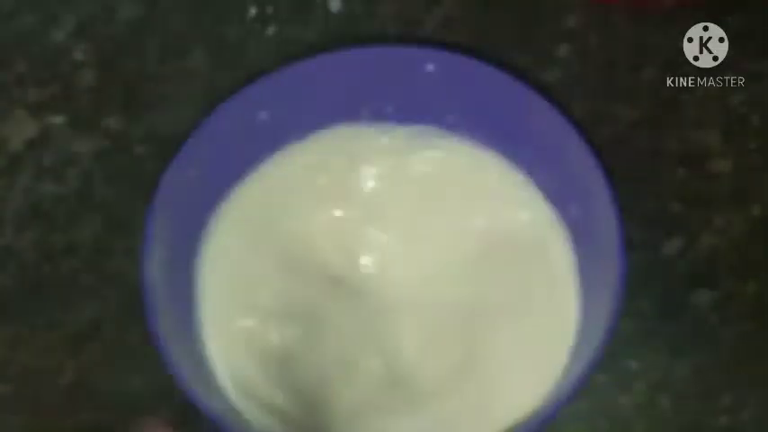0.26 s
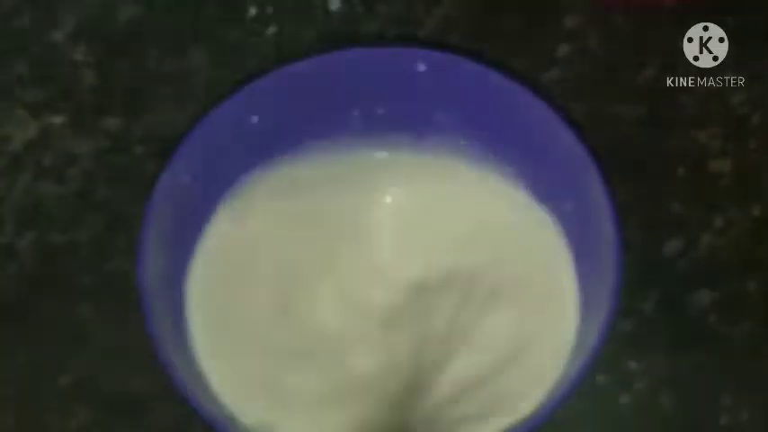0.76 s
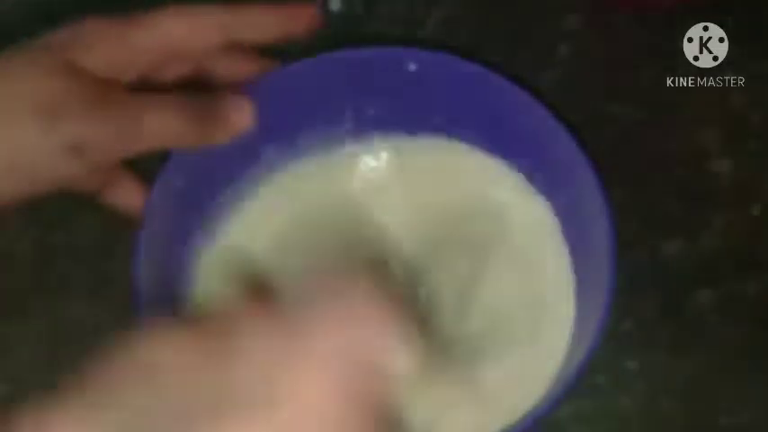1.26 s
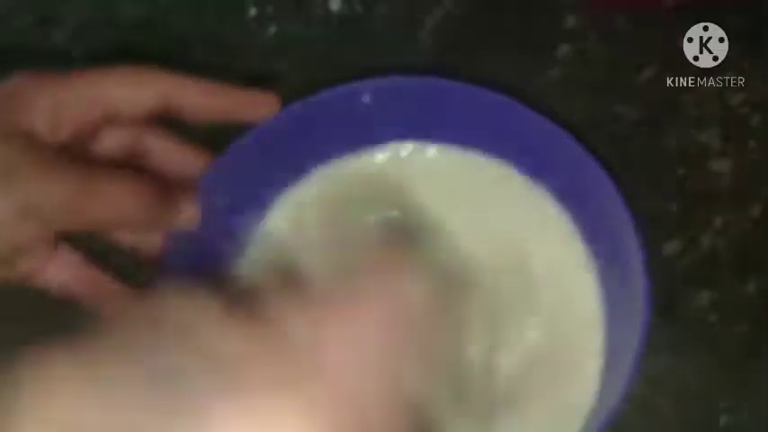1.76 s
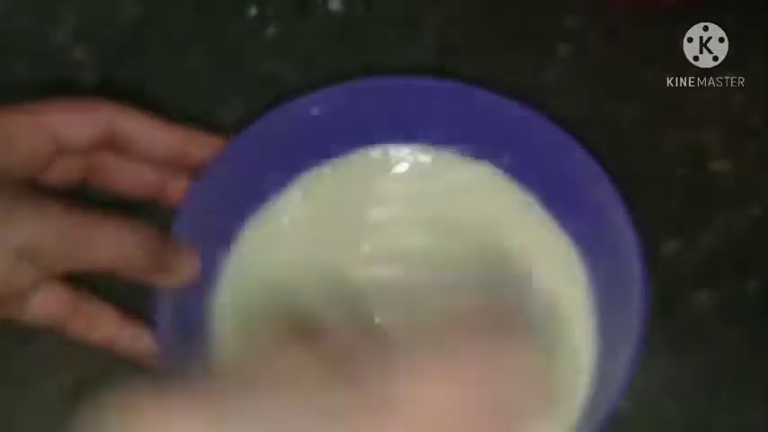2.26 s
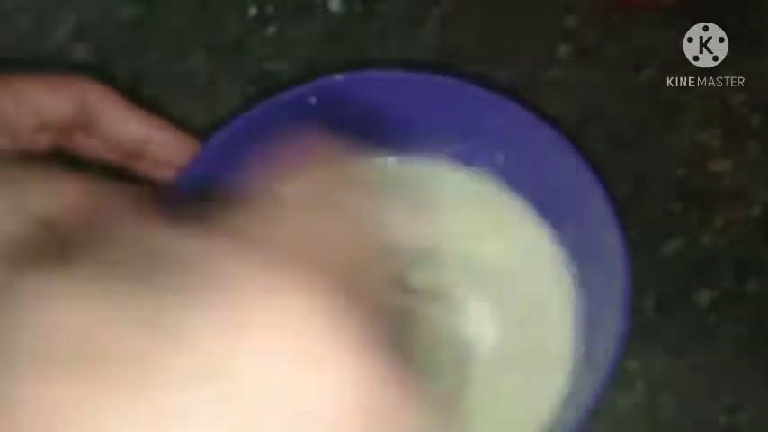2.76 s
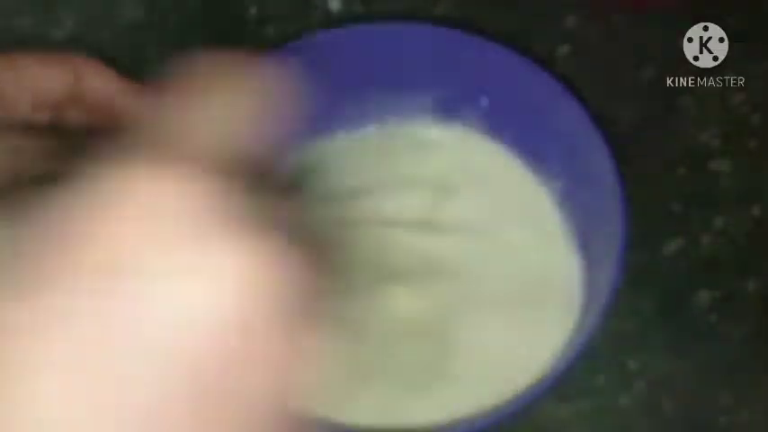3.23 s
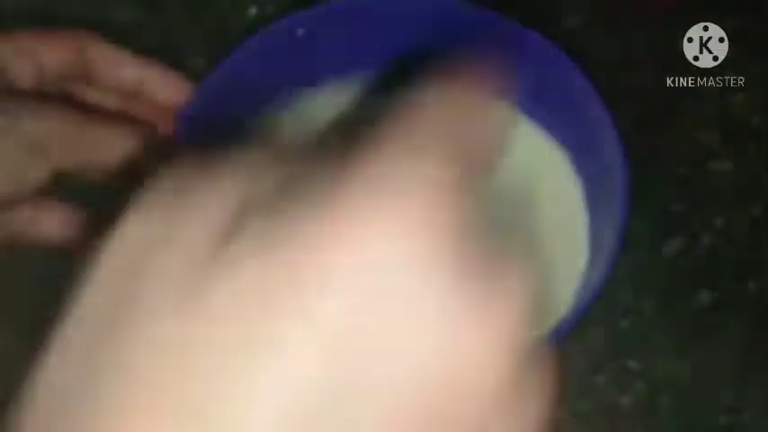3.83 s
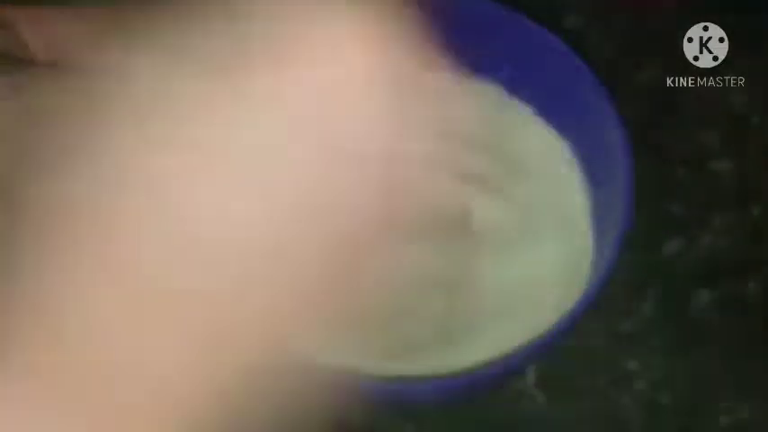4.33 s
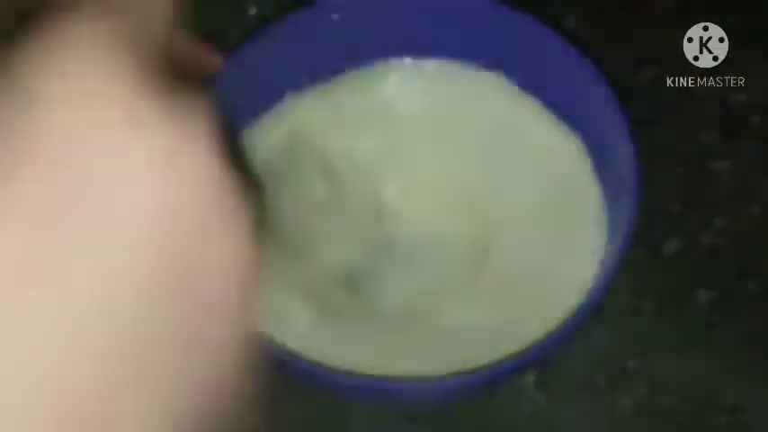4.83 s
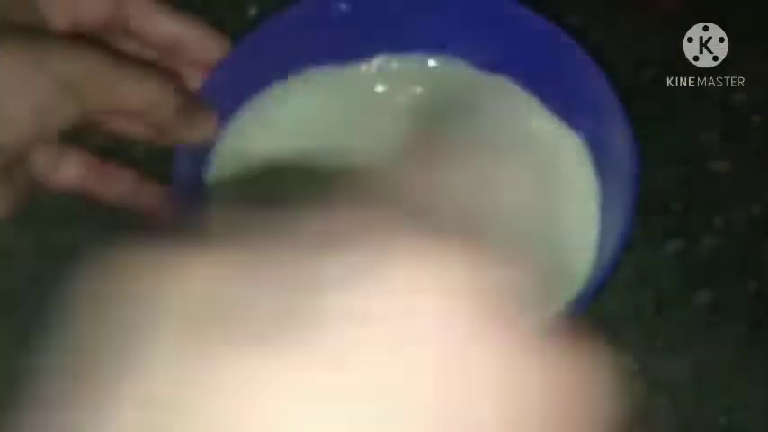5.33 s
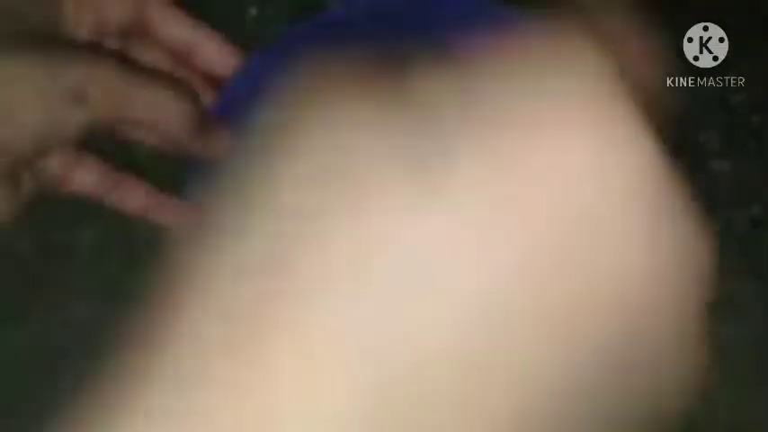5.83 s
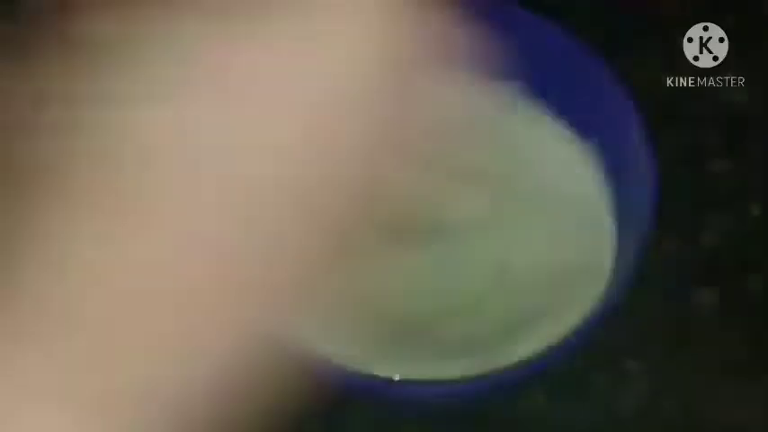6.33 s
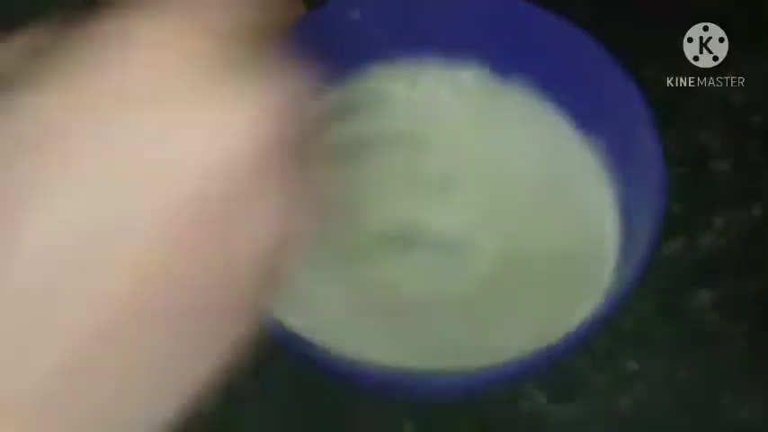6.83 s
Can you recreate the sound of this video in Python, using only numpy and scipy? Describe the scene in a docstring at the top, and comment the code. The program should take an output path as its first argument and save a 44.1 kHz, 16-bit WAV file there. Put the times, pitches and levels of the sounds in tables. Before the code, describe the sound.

A wire whisk beats thin batter in a plastic bowl at about four or five sweeps a second. Bright clacks on the wall alternate with duller wet sloshes, skittering wire clicks and bubbly swishes. After about four seconds the strokes get stronger and the bowl rings more hollowly, with soft bumps on the counter. Close microphone in a small, lightly reverberant kitchen, over faint hum and hiss.

```python
"""A wire whisk beats thin batter in a plastic bowl, about four and a half sweeps a second, in a small kitchen.
From the start bright touches clack on the wall, dull ones slosh softly, and clicks skitter after both; between
them the wires tear a swish from the batter and leave ringing bubbles. Hollow bowl notes bend, soft bumps fall.
After about four seconds the strokes swell, and from 4.8 s the hand bears down and the bowl rings more.
Mains hum, made of sines, and a rumble with hiss, made of coloured noise, lie underneath to the end."""
import sys
import numpy as np
from scipy import signal
from scipy.fft import rfft, irfft
from scipy.io import wavfile

SR = 44100
rng = np.random.default_rng(int(sys.argv[2]) if len(sys.argv) > 2 else 0)


def materialize(psi):
    """Save the field psi as 16-bit PCM at rate SR to the path in sys.argv[1].

    A 1-D psi becomes a single channel; in a 2-D psi each row is a channel.
    """
    bounded = np.clip(np.atleast_2d(psi).T, -1, 1)
    quanta = np.round(bounded * 32767).astype(np.int16)
    wavfile.write(sys.argv[1], SR, quanta)


N = 312649
T = np.arange(N) / SR

# mains lines: (frequency [Hz], rms level [dB])
HUM = [(49.7, -60), (99.2, -68), (149, -69)]
# colour of the still room: (frequency [Hz], relative density [dB per Hz])
ROOM_COLOUR = [(20, 0.5), (45, -10), (80, 5), (115, 0), (180, -11.5), (400, -8), (1500, -32), (6000, -16.5),
               (15000, -28)]
ROOM_RMS_DB = -61
# bumps of the bowl rocking on the counter: (time [s], relative level [dB])
THUMPS = [(1.37, -42), (2.118, -46), (2.298, -46), (3.291, -45), (4.843, -48), (5.448, -42), (5.887, -41),
          (6.099, -37.5), (6.338, -42), (6.952, -41.5)]
# sweeps of the whisk through the batter, about one a turn: (time [s], stroke level [dB], hold [s])
SWEEPS = [(-0.02, -46, 0.026), (0.222, -47.5, 0.026), (0.482, -45, 0.058), (0.67, -44.5, 0.13),
          (0.908, -49.5, 0.046), (1.24, -59, 0.19), (1.43, -50, 0.13), (1.775, -46, 0.055),
          (1.955, -52, 0.14), (2.206, -54.5, 0.15), (2.48, -47, 0.1), (2.57, -48.5, 0.014),
          (2.786, -54, 0.0081), (2.96, -48, 0.014), (3.04, -45, 0.046), (3.346, -47.5, .1),
          (3.61, -46, 0.11), (3.834, -43, 0.084), (4.028, -47.5, 0.13), (4.284, -37.5, 0.017),
          (4.495, -38, 0.037), (4.714, -37, 0.013), (4.941, -37, 0.016), (5.15, -36.5, 0.027),
          (5.322, -42, 0.12), (5.609, -39, 0.022), (5.798, -42.5, 0.1), (6.013, -39.5, .08),
          (6.241, -41, 0.098), (6.496, -38.5, 0.044), (6.711, -42, 0.091), (6.959, -40, 0.082)]
SWEEP_ATTACK_S, SWEEP_RELEASE_DB_PER_S = 0.036, 117
STIR_DB = -50.5  # the batter keeps swirling between sweeps
# the hand bears down from this time on, and the bowl rings more
FIRM_FROM_S, FIRM_RISE_S, LIGHT_HAND_DB = 4.8, 0.77, -9
# hollow notes of the bowl as the wires knock or press on it, each bending a little:
# (time [s], pitch [Hz], relative level [dB])
HOLLOW_NOTES = [(0.257, 878, -34.5), (1.163, 1894, -41.5), (1.288, 1670, -39), (1.382, 897, -39),
                (1.475, 880, -35), (2.641, 857, -34), (3.945, 920, -40), (4.273, 887, -38.5),
                (4.553, 1717, -27.5), (4.794, 886, -28), (4.993, 865, -28), (5.197, 1723, -30),
                (5.453, 892, -28.5), (5.899, 897, -28.5), (6.106, 899, -34), (6.17, 893, -34.5),
                (6.54, 1717, -30), (6.58, 917, -33.5), (6.615, 892, -32.5)]
# fainter notes that every touch wakes: (pitch [Hz], level relative to the touch [dB])
FAINT_NOTES = [(1760, -24.5), (2300, -28.5), (3250, -25.5)]
# colour of the torn batter: (frequency [Hz], relative density [dB per Hz])
SWISH_COLOUR = [(120, -62), (200, -24), (407, -15.5), (506, -21), (575, -9.5), (812, -11), (890, 6),
                (1050, -20), (1510, -7.5), (1740, -3.5), (1980, -6.5), (6240, -13.5), (9660, -23.5),
                (15500, -19)]
# colour of wire on plastic: (frequency [Hz], relative density [dB per Hz])
TOUCH_COLOUR = [(120, -56), (200, -31), (462, -33.5), (575, -5), (677, -2.5), (890, -4), (1030, -0.5),
                (1450, -12), (1740, 5.5), (1980, -5.5), (2960, -3.5), (4030, -6.5), (6130, -7),
                (10000, -16), (15500, -3)]
# clear touches of the whisk: bright rows are clacks on the wall, dull ones soft sloshes of batter:
# (time [s], relative level [dB], hollowness [dB], brightness [dB], t60 of the skitter [s])
CONTACTS = [(0.026, -18.5, -26, -18, 0.08), (0.131, -28, -9.5, -24, 0.16), (0.171, -19, -15, -12, 0.061),
            (0.249, -16.5, -17.5, -18.5, 0.082), (0.354, -21, -9.5, -18, 0.083),
            (0.366, -21.5, -12.5, -10, 0.064), (0.486, -10, -18.5, -13.5, 0.038),
            (0.567, -26, -9, -25, 0.052), (0.583, -19.5, -12, -12, 0.14), (0.711, -13, -18, -15, 0.049),
            (0.821, -17, -18, -12, 0.07), (0.932, -14, -17.5, -12, 0.047), (0.974, -27, -8, -15, 0.13),
            (1.05, -28, -11.5, -17, 0.087), (1.162, -30, -19, -16, 0.051), (1.257, -27, -6.5, -13, 0.086),
            (1.264, -20.5, -16, -21, 0.052), (1.286, -30, -22, -10, 0.07),
            (1.353, -27.5, -11.5, -13.5, 0.18), (1.46, -20.5, -8.5, -15, 0.051),
            (1.474, -20, -12, -13.5, 0.055), (1.59, -29.5, -12, -15.5, 0.21),
            (1.723, -23.5, -9.5, -11.5, 0.028), (1.737, -22, -15, -15, 0.044),
            (1.792, -25.5, -23, -16, 0.098), (1.814, -26, -26, -16, 0.086),
            (1.961, -25.5, -11.5, -15, 0.098), (1.976, -19, -18.5, -19.5, 0.038),
            (2.032, -25.5, -11, -20, 0.098), (2.066, -26.5, -14, -19, 0.21), (2.204, -24, -12, -18, 0.049),
            (2.224, -20, -32, -12.5, 0.1), (2.296, -19.5, -11, -17, 0.11), (2.333, -23, -23, -22, 0.2),
            (2.364, -22.5, -11, -20, 0.12), (2.45, -25.5, -33, -17, 0.047), (2.479, -22, -26, -16, 0.035),
            (2.528, -29.5, -8, -26, 0.21), (2.629, -13.5, -16, -17, 0.097), (2.778, -25.5, -24, -23, 0.11),
            (2.824, -19, -24, -19, 0.086), (2.913, -33.5, -7, -18, 0.053), (2.975, -24, -15, -24, 0.18),
            (3.077, -9.5, -13, -12.5, 0.059), (3.205, -23, -10, -29, 0.064),
            (3.288, -22, -14, -15.5, 0.087), (3.398, -23, -22, -16, 0.047), (3.411, -26, -13, -17, 0.095),
            (3.47, -25, -36, -16, 0.21), (3.603, -20.5, -14.5, -19, 0.027), (3.628, -19, -20, -15, 0.046),
            (3.671, -20.5, -20, -23, 0.07), (3.701, -20.5, -31, -18, 0.07), (3.865, -24.5, -14, -22, 0.048),
            (3.887, -16, -22, -15, 0.058), (3.927, -23.5, -22, -15, 0.11), (4.069, -20.5, -19, -16, 0.051),
            (4.112, -20, -40, -18, 0.097), (4.149, -22.5, -32, -20, 0.19), (4.26, -23.5, -14, -23, 0.11),
            (4.3, -22.5, -13, -18, 0.1), (4.328, -11, -18, -18, 0.032), (4.358, -20.5, -17, -18, 0.07),
            (4.487, -29.5, -8.5, -19, 0.07), (4.516, -22.5, -15, -21, 0.084),
            (4.549, -15.5, -13.5, -22, 0.046), (4.618, -21.5, -6, -13.5, 0.088),
            (4.748, -18.5, -6, -13, 0.056), (4.755, -9, -12, -14.5, 0.033), (4.788, -25, -4, -25, 0.043),
            (4.845, -11.5, -10.5, -15.5, 0.066), (4.977, -10.5, -14.5, -15.5, 0.08),
            (5.18, -14.5, -12.5, -18, 0.047), (5.268, -18.5, -14, -18, 0.058),
            (5.371, -16.5, -10.5, -15, 0.079), (5.446, -18.5, -4.5, -15, 0.036),
            (5.492, -22, -8, -14, 0.055), (5.603, -21.5, -11, -15.5, 0.2), (5.635, -19, -13, -20, 0.078),
            (5.709, -20.5, -24, -19, 0.07), (5.796, -28, -5, -12, 0.04), (5.817, -17, -17, -14, 0.045),
            (5.841, -18, -13, -12, 0.049), (5.89, -16, -11, -16.5, 0.053), (5.934, -18.5, -15, -23, 0.032),
            (6.044, -14, -19, -16, 0.023), (6.072, -18, -12, -14, 0.041), (6.099, -25, -6, -14, 0.081),
            (6.154, -17, -17, -21, 0.041), (6.274, -18, -14.5, -18, 0.075), (6.3, -19.5, -6.5, -8, 0.027),
            (6.34, -20, -9, -12, 0.045), (6.373, -29, -22, -20, 0.07), (6.506, -17.5, -17, -20.5, 0.055),
            (6.537, -20, -12.5, -15, 0.039), (6.606, -21.5, -9, -15, 0.054), (6.712, -25.5, -7, -12, 0.033),
            (6.737, -19, -10.5, -13.5, 0.13), (6.792, -23, -12, -32, 0.12), (6.847, -18, -6.5, -18, 0.044),
            (6.943, -28, -9, -13, 0.046), (6.97, -18.5, -11, -13.5, 0.066), (7.006, -25.5, -4.5, -18, 0.11),
            (7.08, -22, -9, -21, 0.062)]
# light grazes besides the clear touches; their level is counted from the stroke level
GRAZES_PER_S = 6
GRAZE_DB, GRAZE_HOLLOW_DB, GRAZE_BRIGHT_DB, GRAZE_T60_S = 17.5, -18.5, -18.5, 0.042
# resonances of the bowl and the wires: (frequency [Hz], width [Hz], lift, or dip if negative [dB])
BOWL_RESONANCES = [(409.3, 31, 9.5), (578, 13, 8.5), (660, 7.3, 5.5), (768, 17.5, 8), (880, 36, 2),
                   (1300, 140, 3), (1886, 26, 2.5), (2280, 110, 1.5), (2950, 420, 3.5), (3470, 120, 2),
                   (3750, 45, 6.5), (4066, 66, -21), (6220, 690, 4)]
CUTOFF_HZ = 15700


def from_db(db):
    """Decibels to amplitude."""
    return 10 ** (np.asarray(db) / 20)


def rms_one(x):
    """Scale a signal to rms 1."""
    return x / np.sqrt(np.mean(x ** 2) + 1e-20)


def cut(x, hz, kind, order=2):
    """Butterworth low- or high-pass."""
    return signal.sosfilt(signal.butter(order, min(hz, .45 * SR), kind, fs=SR, output="sos"), x)


def coloured(x, spectrum):
    """Filter a sound by a curve of (frequency [Hz], gain [dB]); rms 1."""
    hz, db = np.transpose(spectrum)
    bins = np.maximum(np.arange(len(x) // 2 + 1) * SR / len(x), 1)
    gain = from_db(np.interp(np.log(bins), np.log(hz), db))
    return rms_one(irfft(rfft(x) * gain, len(x)))


def drift(rate):
    """Slow chance: random knots, rate of them a second, joined by lines; rms 1."""
    knots = rng.standard_normal(4096)
    return rms_one(np.interp(T * rate, np.arange(len(knots)), knots))


def resonance(x, hz, width_hz):
    """Two-pole resonance with gain 1 on top."""
    r = np.exp(-np.pi * width_hz / SR)
    b = np.array([1, 0, -1]) * (1 - r * r) / 2
    a = [1, -2 * r * np.cos(2 * np.pi * hz / SR), r * r]
    return signal.lfilter(b, a, x + 1e-18)


def flicks(per_s, spread_db):
    """Clicks at random moments, uneven in size and sign."""
    gaps, sizes, signs = rng.random((3, 40000))
    at = (np.cumsum(-np.log(1 - gaps)) * SR / per_s).astype(int)
    # sqrt(12) turns the spread of a uniform draw into 1
    strength = from_db(spread_db * np.sqrt(12) * (sizes - .5)) * np.sign(signs - .5)
    return np.bincount(at[at < N], strength[at < N], N)


def add(out, s, sound):
    """Mix a short sound in at time s."""
    start = int(np.clip(s * SR, 0, N - 1))
    out[start:start + len(sound)] += sound[:N - start]


def still_room():
    """Mains hum over a steady low rumble and hiss."""
    hum = sum(from_db(db) * np.sqrt(2) * np.sin(2 * np.pi * (hz * T + rng.random())) for hz, db in HUM)
    return hum + from_db(ROOM_RMS_DB) * coloured(rng.standard_normal(N), ROOM_COLOUR)


def kitchen(x, wet_db=-12.5, t60=0.98, treble_t60=0.32, treble_db=5.0, split_hz=5000, build_s=0.0042):
    """Diffuse echoes build up within a few milliseconds; the treble dies first."""
    t = T[:SR // 2]
    noise = rng.standard_normal(len(t))
    body = cut(noise, split_hz, "low") * from_db(-60 * t / t60)
    treble = cut(noise, split_hz, "high", order=4) * from_db(treble_db - 60 * t / treble_t60)
    tail = (body + treble) * (1 - np.exp(-t / build_s))
    return from_db(wet_db) * signal.oaconvolve(x, tail / np.linalg.norm(tail))[:N]


def thumps(thump_db=-3.0, thump_hz=98, pitch_spread=0.14, swell_s=0.0091, t60=0.28):
    """The weight of the bowl settles on the counter with a soft, low bump."""
    out, t = np.zeros(N), T[:SR // 3]
    envelope = np.minimum(t / swell_s, 1) * from_db(-60 * t / t60)
    for (s, db), shift in zip(THUMPS, rng.standard_normal(len(THUMPS))):
        hz = thump_hz * (1 + pitch_spread * shift)
        add(out, s, from_db(db + thump_db) * envelope * np.sin(2 * np.pi * hz * t))
    return out


def stroke_level():
    """Stroke level in dB: every sweep swells, holds and dies into the steady swirl."""
    power = from_db(STIR_DB) ** 2
    for s, db, hold_s in SWEEPS:
        attack = np.clip((T - s) / SWEEP_ATTACK_S, 0, 1)
        released_s = np.clip(T - s - SWEEP_ATTACK_S - hold_s, 0, 1)
        power = power + (attack * from_db(db - SWEEP_RELEASE_DB_PER_S * released_s)) ** 2
    return 10 * np.log10(power)


def sloshing(stroke_db, rumble_db=-26.0, rumble_hz=92, glug_db=-24.0, glug_hz=255, glugs_per_s=25,
             glug_follows=0.45):
    """The mass of batter swings with each stroke: the bowl rumbles and big air pockets glug softly."""
    rumble = rms_one(resonance(resonance(rng.standard_normal(N), rumble_hz, 50), rumble_hz, 66))
    pockets = flicks(glugs_per_s, spread_db=1.0)
    glugs = rms_one(resonance(resonance(pockets, glug_hz, 48), glug_hz, 106))
    # the glugs follow the strokes less than the rumble does
    swing_db = stroke_db.mean() + glug_follows * (stroke_db - stroke_db.mean())
    return from_db(stroke_db + rumble_db) * rumble + from_db(swing_db + glug_db) * glugs


def pressure_db(s):
    """How firmly the whisk presses on the bottom: light at first, then 0 dB."""
    return np.interp(s, [FIRM_FROM_S, FIRM_FROM_S + FIRM_RISE_S], [LIGHT_HAND_DB, 0])


def bowl_ring(stroke_db, ring_db=-9.0, ring_hz=900, width_hz=100, fitful_db=2.0, lower_hz=640, lower_db=-7.0):
    """Wires slipping over the bottom keep its modes sounding in fits, more so once the hand bears down."""
    slips = flicks(500, spread_db=9.5)
    main = rms_one(resonance(resonance(slips, ring_hz, width_hz), ring_hz, 2 * width_hz))
    lower = rms_one(resonance(resonance(slips, lower_hz, 2 * width_hz), lower_hz, 2 * width_hz))
    ring = from_db(fitful_db * drift(25)) * main
    ring = ring + from_db(lower_db + fitful_db * drift(25)) * lower
    return from_db(stroke_db + pressure_db(T) + ring_db) * ring


def note(hz, swell_s=0.0065, t60_at_1k=0.073, bend=0.016):
    """A hollow note swells while a wire drags, then dies, the higher ones sooner; its pitch bends a little."""
    t = T[:SR // 10]
    t60 = t60_at_1k * np.sqrt(1000 / hz)
    envelope = np.minimum(t / swell_s, 1) * from_db(-60 * np.maximum(t - swell_s, 0) / t60)
    pitch = hz * (1 + bend * rng.standard_normal() * np.tanh(t / swell_s - 1))
    return envelope * np.sin(2 * np.pi * np.cumsum(pitch) / SR)


def hollow_notes(contacts, loud_db=4.0, lead_s=.007, lag_s=0.013, detune=0.0413, uneven_db=5.0):
    """Loud hollow notes, and faint notes just after every touch, detuned by the sloshing batter."""
    out = np.zeros(N)
    for s, hz, db in HOLLOW_NOTES:
        # the swell starts ahead of the listed time
        add(out, s - lead_s, from_db(db + loud_db) * note(hz))
    for s, db, *_ in contacts:
        for hz, note_db in FAINT_NOTES:
            shift, size = rng.standard_normal(2)
            level = from_db(db + note_db + uneven_db * size)
            add(out, s + lag_s * rng.random(), level * note(hz * (1 + detune * shift)))
    return out


def batter(stroke_db, swish_db=-2.5, spray_db=-5.0, bubble_db=-7.5, spray_hz=5000, spray_growth=1.6,
           tears_per_s=3600, bubbles_per_s=22, cycles=24.0, bubble_hz=1700, lumpy_db=3.0, count=30):
    """The wires tear the surface in tiny snaps and whip in bubbles that ring briefly."""
    tearing = coloured(flicks(tears_per_s, spread_db=3.0), SWISH_COLOUR)
    swish_level = from_db(stroke_db + swish_db + lumpy_db * drift(120))
    swish = swish_level * cut(tearing, spray_hz, "low", order=3)
    # fine spray grows faster with the stroke than the swish does
    spray_stroke_db = stroke_db.mean() + spray_growth * (stroke_db - stroke_db.mean())
    spray_level = from_db(spray_stroke_db + spray_db + lumpy_db * drift(120))
    spray = spray_level * cut(tearing, spray_hz, "high", order=3)
    # bubbles of many sizes, the middling ones loudest
    bubbles = np.zeros(N)
    for hz in np.geomspace(520, 3500, count):
        weight = 1 / (1 + np.log(hz / bubble_hz) ** 2)
        pops = flicks(bubbles_per_s, spread_db=10.5)
        bubbles += weight * rms_one(resonance(pops, hz, hz / cycles))
    return swish + spray + from_db(stroke_db + bubble_db) * rms_one(bubbles)


def grazes(stroke_db):
    """Light touches at loosely even moments, as strong as the stroke; rows like those of the clear touches."""
    offsets = rng.random(256)
    moments = (np.arange(len(offsets)) + offsets) / GRAZES_PER_S
    return [(s, stroke_db[int(s * SR)] + GRAZE_DB, GRAZE_HOLLOW_DB, GRAZE_BRIGHT_DB, GRAZE_T60_S)
            for s in moments if s < T[-1]]


def crowded_modes(t60, ping_db, patchy_db=3.0, count=10):
    """One click sets off a crowd of quickly damped modes, of which a few stand out as pings; energy 1."""
    t = T[:SR // 8]
    ping_hz = np.exp(rng.uniform(np.log(1100), np.log(9000), (count, 1)))
    pings = rms_one(np.sin(2 * np.pi * ping_hz * t).sum(0))
    # every spot on the wall has a colour of its own
    colour = [(hz, db + patchy_db * rng.standard_normal()) for hz, db in TOUCH_COLOUR]
    crowd = rng.standard_normal(len(t)) + from_db(ping_db) * pings
    response = coloured(crowd, colour) * from_db(-60 * t / t60)
    return response / np.linalg.norm(response)


def wire_response(low_t60, mid_t60, high_t60, low_hz, high_hz, ping_db):
    """How one wire rings: the plastic wall gives the body of a touch, the steel its tick; low, mid, high."""
    low = cut(crowded_modes(low_t60, ping_db), low_hz, "low", order=3)
    mid = cut(crowded_modes(mid_t60, ping_db), low_hz, "high", order=3)
    mid = cut(mid, high_hz, "low", order=3)
    high = cut(crowded_modes(high_t60, ping_db), high_hz, "high", order=3)
    return low, mid, high


def touches(contacts, low_db=25.0, mid_db=11.0, high_db=22.5, low_t60=0.09, mid_t60=0.047, high_t60=0.041,
            low_hz=1200, high_hz=5000, uneven_db=7.5, colour_db=2.0, first_db=1.5, scrape_db=-32.0,
            scrape_rise_db_per_s=12000, ping_db=-5.0, wire_gap_s=.0027, count=14, size=6):
    """Wires scrape in softly, one hits, the others skitter after it; each wire rings in its own way."""
    responses = [wire_response(low_t60, mid_t60, high_t60, low_hz, high_hz, ping_db) for _ in range(count)]
    force = np.zeros((count, 3, N + SR))  # wire, band, time
    for s, db, hollow_db, bright_db, skitter_t60 in contacts:
        gaps, sizes, choice = rng.random((3, 40))
        after = np.cumsum(wire_gap_s * (.25 + 1.5 * gaps))
        after -= after[size]  # this many clicks come before the hit
        # a dull contact is cushioned by batter and comes in more slowly
        scraping = min(scrape_db, db) + scrape_rise_db_per_s * from_db(bright_db) * after
        skittering = db - 60 * after / max(skitter_t60, .005)
        strength = from_db(np.where(after < 0, scraping, skittering))
        strength[size] = from_db(db + first_db)
        # only three neighbouring wires face the wall at a time
        wires = (rng.integers(count) + (3 * choice).astype(int)) % count
        at = (np.maximum(s + after, 0) * SR).astype(int)
        for band, band_db in enumerate([low_db + hollow_db, mid_db, high_db + bright_db]):
            # the energy of the touch is shared unevenly among its clicks
            unevenness = uneven_db * (sizes - .5) + colour_db * rng.standard_normal(len(at))
            shares = strength * from_db(unevenness)
            shares = np.linalg.norm(strength) * shares / np.linalg.norm(shares)
            force[wires, band, at] += from_db(band_db) * shares
    out = np.zeros(N)
    for wire, rings in zip(force, responses):
        for clicks, response in zip(wire, rings):
            out += signal.oaconvolve(clicks[:N], response)[:N]
    return out


def through_bowl(x):
    """The bowl and wires lift their resonances, dip one band, and radiate little bass."""
    shaped = x + sum((from_db(db) - 1) * resonance(x, hz, width) for hz, width, db in BOWL_RESONANCES)
    return cut(shaped, 311, "high", order=3)


def scene():
    """Whisk, batter and bowl in the kitchen; only the whisking is echoed by the room."""
    stroke_db = stroke_level()
    underneath = sloshing(stroke_db) + thumps() + still_room()
    contacts = list(CONTACTS) + grazes(stroke_db)
    ringing = bowl_ring(stroke_db) + hollow_notes(contacts)
    whisking = ringing + through_bowl(batter(stroke_db) + touches(contacts))
    return (whisking + kitchen(whisking) + underneath)[None]


def record(dry):
    """A steep elliptic low-pass cuts the top."""
    return signal.sosfilt(signal.ellip(12, .2, 80, CUTOFF_HZ, fs=SR, output="sos"), dry)


dry = scene()
out = record(dry)
materialize(out)
```